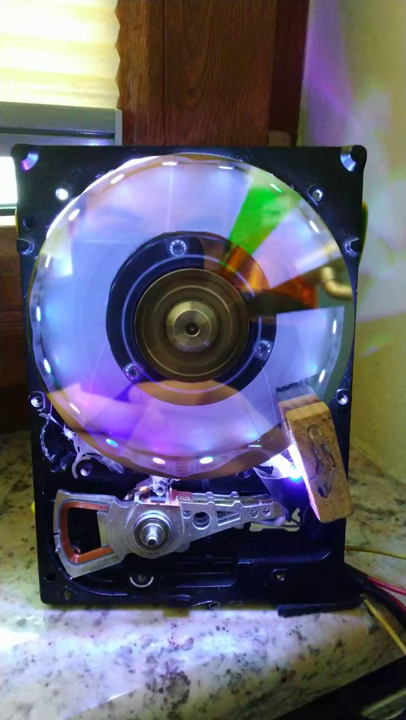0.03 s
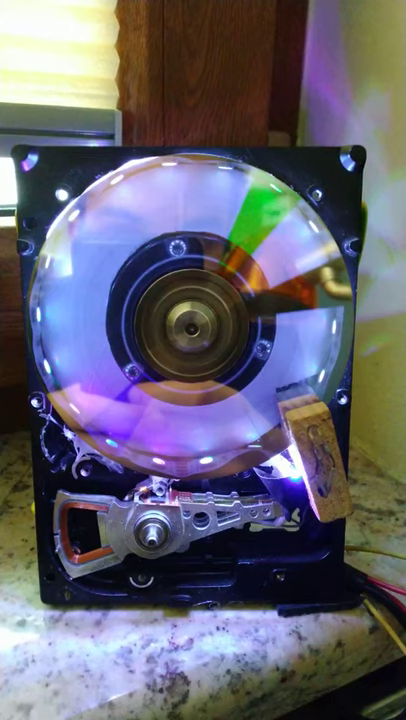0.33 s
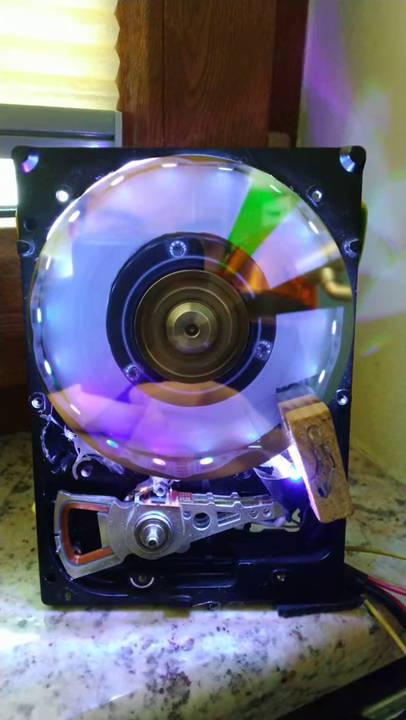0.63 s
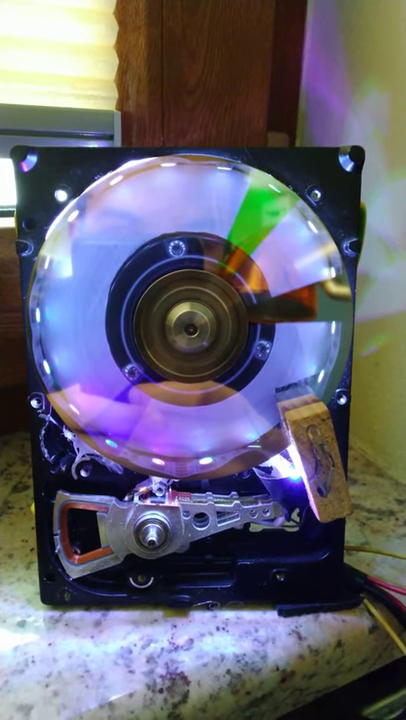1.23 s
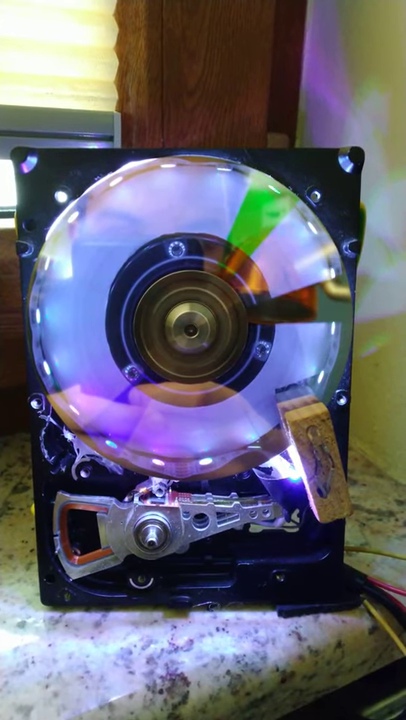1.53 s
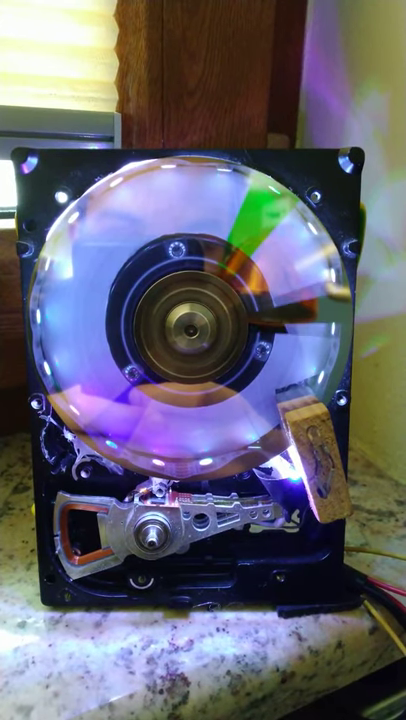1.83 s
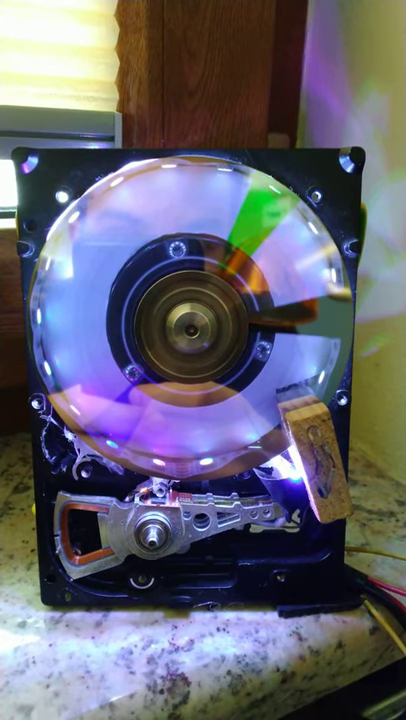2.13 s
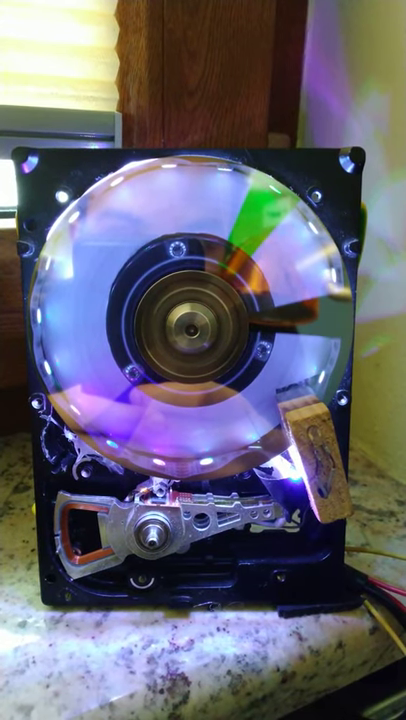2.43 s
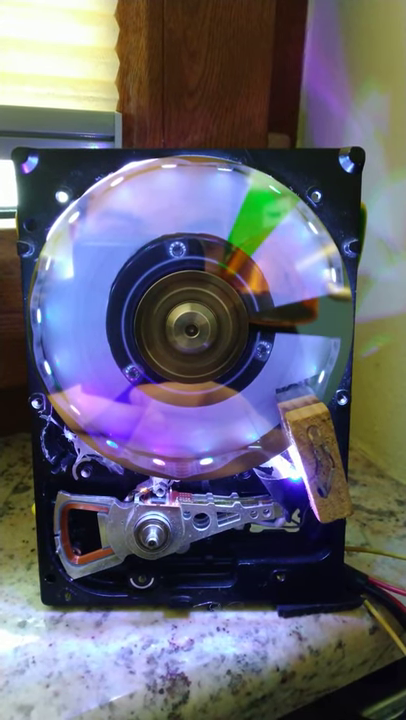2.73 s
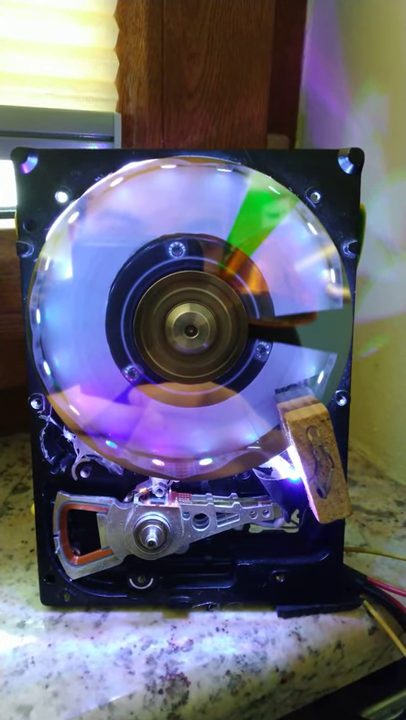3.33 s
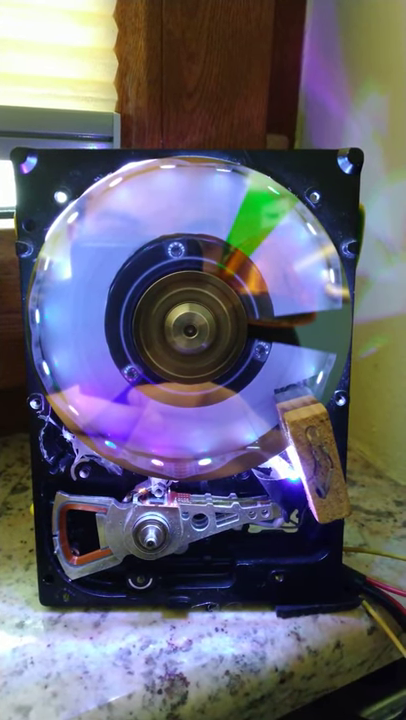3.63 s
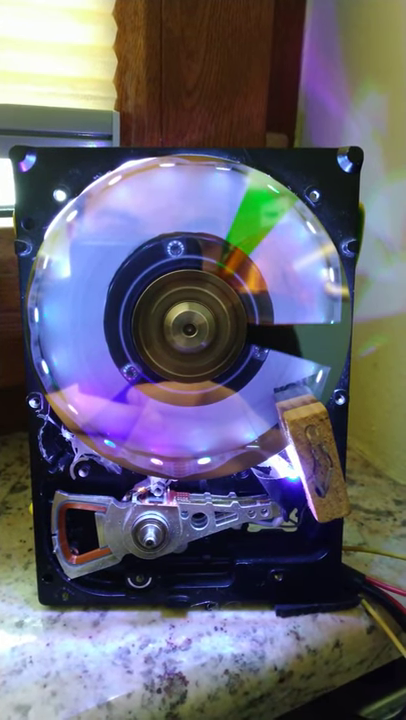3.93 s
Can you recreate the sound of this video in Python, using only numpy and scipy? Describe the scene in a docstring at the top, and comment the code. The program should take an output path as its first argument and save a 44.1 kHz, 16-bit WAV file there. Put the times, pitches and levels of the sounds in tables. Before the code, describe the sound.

Steady rushing whir of a spinning hard drive platter over a low hum.

```python
"""An opened hard drive spins steadily on a stone counter, close to a camera's stereo microphones.
Air rushes off the platter, its hiss pulsing a little each turn, and stirs a few narrow resonances;
the spindle motor whines on multiples of its speed. The rush sits left of centre.
Behind the drive hum the mains and what is probably a cooling fan. The sound fades in at the start."""
import sys
import numpy as np
from scipy.fft import rfft, irfft, next_fast_len
from scipy.io import wavfile
from scipy.ndimage import map_coordinates

SR = 44100
rng = np.random.default_rng(int(sys.argv[2]) if len(sys.argv) > 2 else 0)


def log_audio(samples):
    """Write samples as a 16-bit WAV file to the path given in sys.argv[1]."""
    # one column per channel
    frames = np.atleast_2d(samples).T
    # limit to full scale, then quantise
    limited = np.clip(frames, -1, 1)
    pcm = np.round(limited * 32767).astype(np.int16)
    wavfile.write(sys.argv[1], SR, pcm)


N = 176400


def amp(db):
    """Decibels to gain."""
    return 10 ** (np.asarray(db) / 20)


def along(points, hz, column=1):
    """One column of a table, read on a log frequency axis."""
    table = np.asarray(points, float)
    return np.interp(np.log(hz + 1), np.log(table[:, 0] + 1), table[:, column])


def wobble(rate):
    """A smooth random curve with `rate` knots a second."""
    knots = rng.standard_normal(int(N * rate / SR) + 4)
    return map_coordinates(knots, [np.arange(N) * rate / SR])


def filtered(x, response):
    """x through a filter whose gain is response(hz)."""
    size = next_fast_len(N + SR // 2)
    hz = np.fft.rfftfreq(size, 1 / SR)
    return irfft(rfft(x, size) * response(hz), size)[..., :N]


def rotation(hz, drift):
    """Running angle in radians of a shaft or a hum; its rate wanders by the fraction `drift`."""
    return 2 * np.pi * np.cumsum(hz * (1 + drift * wobble(2.974))) / SR


# How far the left microphone leads the right: (frequency [Hz], phase [rad])
LEFT_LEAD = [(60, -0.2), (160, -0.64), (300, -0.36), (450, 0.57), (560, 1.1), (640, -1.44), (800, 1.96),
             (900, 1.6), (1030, 3.5), (1440, 3.5), (1600, 6), (2100, 5), (2700, 4), (3000, 6.7),
             (3250, 7.5), (3700, 7), (4500, 9), (5500, 9), (6200, 13.5), (11000, 13.5), (13500, 14.5)]

def tones(table, angle, gain_db, waver_db, scatter_rad):
    """Wavering tones on multiples of an angle, each with its own level and phase at each microphone."""
    stereo = np.zeros((2, N))
    rate_hz = angle[-1] / (2 * np.pi) * SR / N
    for multiple, left_db, right_db in table:
        lead = along(LEFT_LEAD, multiple * rate_hz) + scatter_rad * rng.standard_normal()
        phase = rng.uniform(0, 2 * np.pi) + np.array([[lead], [0]])
        waver = amp(waver_db * wobble(7.02))
        stereo += amp([[left_db], [right_db]]) * waver * np.sin(multiple * angle + phase)
    return np.sqrt(2) * amp(gain_db) * stereo


HUM_HZ = 99.9
# Hum harmonics, relative levels: (multiple of HUM_HZ, left [dB], right [dB])
HUM_TONES = [(1, -48.5, -52), (2, -66.5, -67.5), (3, -75, -76)]

def mains_hum():
    """A low electrical hum in the background."""
    angle = rotation(HUM_HZ, drift=0.0023)
    return tones(HUM_TONES, angle, gain_db=-0.5, waver_db=0.5, scatter_rad=0.4)


FAN_HZ = 22.375
# Tones of seven blades and their shaft, relative levels: (multiple of FAN_HZ, left [dB], right [dB])
FAN_TONES = [(7, -47.9, -64), (8, -65, -72), (9, -63, -65), (10, -73, -77), (12, -61, -70), (14, -58, -72),
             (15, -71, -76), (20, -57, -68.5), (21, -61.5, -72), (24, -73, -75), (28, -58, -82),
             (35, -67, -73), (36, -76, -77), (42, -64, -70), (44, -72, -85), (49, -70, -83), (54, -79, -78),
             (56, -69, -78), (58, -71, -74), (60, -77, -77), (62, -74, -76), (63, -75, -78)]

def cooling_fan():
    """Probably a slow fan, behind the drive and to the left: blade tones and weaker shaft tones."""
    angle = rotation(FAN_HZ, drift=0.0012)
    return tones(FAN_TONES, angle, gain_db=-0.3, waver_db=1.3, scatter_rad=0.3)


# Rushing air at close range, relative density: (frequency [Hz], left [dB], right [dB])
AIR_SPECTRUM = [(15, -95, -106), (27.8, -96, -104), (37.6, -80, -87), (49.4, -66, -82), (91, -63, -81),
                (146, -70.5, -86), (258, -73, -88.5), (376, -78, -89.5), (500, -75.5, -83.5),
                (610, -79, -85.5), (747, -75.5, -83), (843, -79.5, -86), (916, -77, -80), (980, -80, -95.5),
                (1106, -78.5, -88), (1184, -83.5, -87), (1295, -79, -84), (1520, -83, -88.5),
                (1720, -87.5, -91.5), (1980, -87, -89), (2325, -83, -86), (2640, -86, -95.5),
                (2860, -83, -95), (3120, -84.5, -88.5), (3650, -84, -94.5), (3910, -86.5, -96.5),
                (4150, -89.5, -98.5), (4400, -88, -97.5), (4810, -95.5, -98.5), (5030, -101.5, -104.5),
                (6520, -106, -108), (6660, -111.5, -112), (8080, -119.5, -119.5), (8800, -108.5, -110.5),
                (11200, -108.5, -108), (12300, -113, -113), (13400, -110, -109), (14200, -114, -114),
                (15400, -124, -127)]
# How alike the air is at the two microphones: (frequency [Hz], coherence [0-1])
AIR_COHERENCE = [(50, .3), (120, .6), (230, 0.1), (450, 0.46), (610, 0), (750, 0.8), (900, 0.64),
                 (1050, 0.52), (1180, 0.07), (1330, 0.73), (1480, 0.4), (1750, 0.25), (2200, 0.93),
                 (2800, 0.3), (3150, 0.58), (3800, 0.3), (6300, 0), (14000, 0)]

def air_noise():
    """Noise with the colour of the air; the right microphone shares part of the left, shifted in phase."""
    left, independent = rng.standard_normal((2, N)) * np.sqrt(SR / 2)  # unit power per Hz
    coherence = lambda hz: np.clip(along(AIR_COHERENCE, hz), 0, 1)
    shared = filtered(left, lambda hz: coherence(hz) * np.exp(-1j * along(LEFT_LEAD, hz)))
    right_only = filtered(independent, lambda hz: np.sqrt(1 - coherence(hz) ** 2))
    colour = lambda hz: amp([along(AIR_SPECTRUM, hz, column=1), along(AIR_SPECTRUM, hz, column=2)])
    return filtered(np.array([left, shared + right_only]), colour)


# Resonances, probably of the case, the platter and its bearing:
# (frequency [Hz], width of one filter stage [Hz], level [dB], swell depth [dB])
DRIVE_MODES = [(100.3, 21.5, -57.5, 2), (452.5, 37, -68.5, 3), (745, 103, -66, 3.5), (3280, 35, -74, 3)]

def resonance(mode_hz, width_hz, level_db, swell_db):
    """A narrow resonance stirred by the air, swelling at random."""
    band_pass = lambda hz: 1j * hz * width_hz / (mode_hz ** 2 - hz ** 2 + 1j * hz * width_hz)
    ring = filtered(air_noise(), lambda hz: band_pass(hz) ** 2)  # two stages
    ring /= np.sqrt(np.mean(ring ** 2))
    return ring * amp(level_db + swell_db * wobble(9))


# Pulsing of the hiss: (rate [pulses per turn], depth [fraction of amplitude])
HISS_PULSES = [(1, 0.061), (2, .025)]

def platter_air(angle, crossover_hz=1170):
    """Air dragged round by the platter: a turbulent low rush, and a hiss that pulses with each turn."""
    low_share = lambda hz: 1 / (1 + (hz / crossover_hz) ** 4)
    rush = filtered(air_noise(), lambda hz: np.sqrt(low_share(hz)))
    hiss = filtered(air_noise(), lambda hz: np.sqrt(1 - low_share(hz)))
    pulse = 1 + sum(depth * np.cos(per_turn * angle + rng.uniform(0, 2 * np.pi))
                    for per_turn, depth in HISS_PULSES)
    rush_gain = amp(-0.11 + 0.78 * wobble(13))
    hiss_gain = amp(-0.68 + 0.62 * wobble(9.9))
    return rush * rush_gain + hiss * pulse * hiss_gain


SPINDLE_HZ = 66.832
# Whine of the spindle motor, relative levels: (multiple of SPINDLE_HZ, left [dB], right [dB])
SPINDLE_TONES = [(1, -65, -65), (15, -80, -76), (16, -75, -80), (17, -78, -79), (24, -73, -74),
                 (26, -87, -83), (37, -71, -77), (48, -76, -78), (49, -70.5, -77), (61, -76, -97),
                 (73, -84, -91), (96, -88, -91), (106, -93, -93), (132, -98, -87), (144, -94, -96),
                 (147, -90, -97), (156, -84, -94), (160, -93, -84), (164, -79, -83.5), (168, -85, -91),
                 (172, -93, -90), (188, -91, -92), (190, -91, -92), (194, -86, -86), (195, -85, -98),
                 (196, -101, -93), (198, -97, -81), (202, -87, -84), (204, -95, -88), (206, -88, -82)]

def hard_drive():
    """The open drive, close up: one shaft angle times both the motor's whine and the pulsing air."""
    angle = rotation(SPINDLE_HZ, drift=0.00007)
    ringing = sum(resonance(*mode) for mode in DRIVE_MODES)
    air = platter_air(angle)
    whine = tones(SPINDLE_TONES, angle, gain_db=1.5, waver_db=1.25, scatter_rad=0.35)
    return ringing + air + whine


def scene():
    """At the counter: the drive in front of the microphones, fan and hum behind it."""
    return hard_drive() + cooling_fan() + mains_hum()


FADE_START_S, OPEN_S, RISE_S = 0.1, 0.024, 0.25
RISE_FROM_GAIN, BAND_LIMIT_HZ = 0.15, 15606

def record(dry):
    """The camera opens quickly to a low gain, fades up evenly and keeps nothing above its band limit."""
    since_start = np.arange(N) / SR - FADE_START_S
    opening = np.clip(since_start / OPEN_S, 0, 1)
    rise = np.clip(RISE_FROM_GAIN + (1 - RISE_FROM_GAIN) * since_start / RISE_S, 0, 1)
    return filtered(dry * opening * rise, lambda hz: hz < BAND_LIMIT_HZ)


dry = scene()
out = record(dry)
log_audio(out)
```